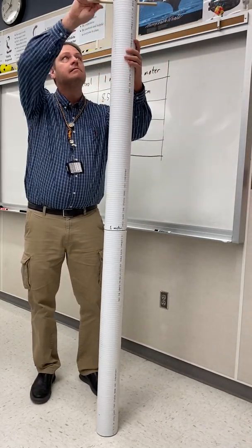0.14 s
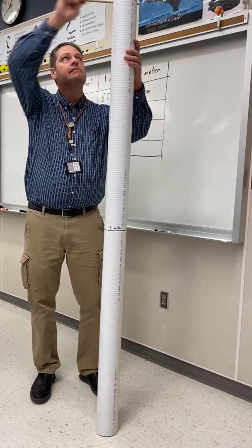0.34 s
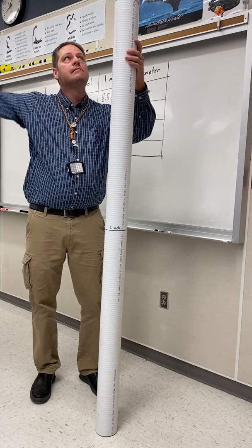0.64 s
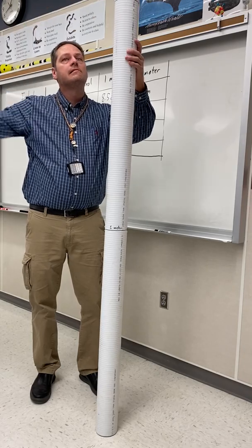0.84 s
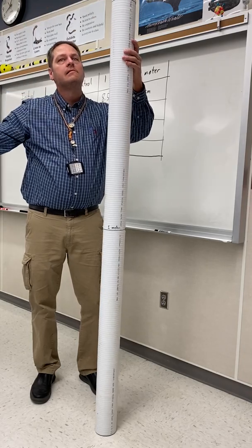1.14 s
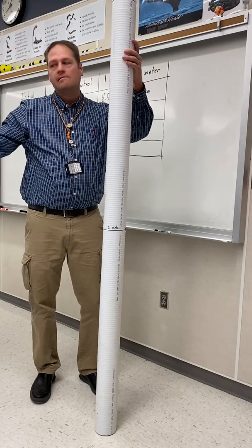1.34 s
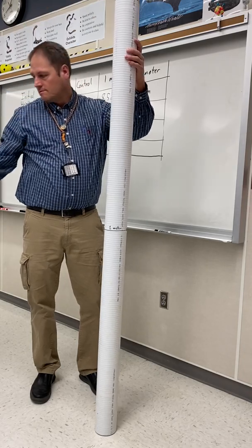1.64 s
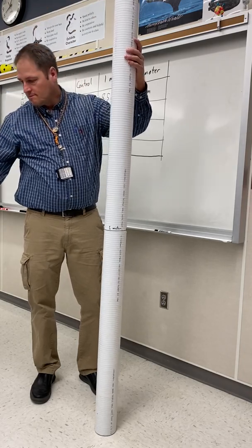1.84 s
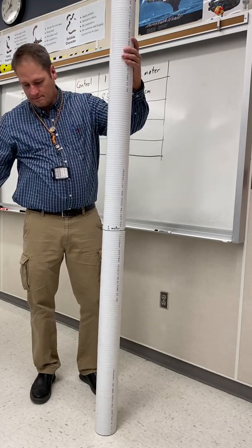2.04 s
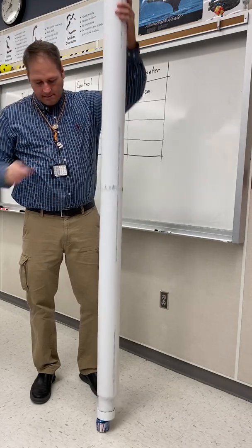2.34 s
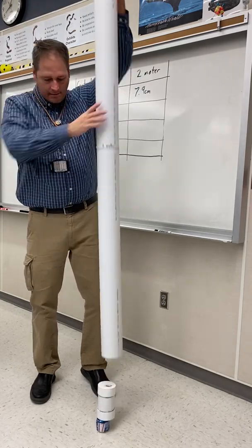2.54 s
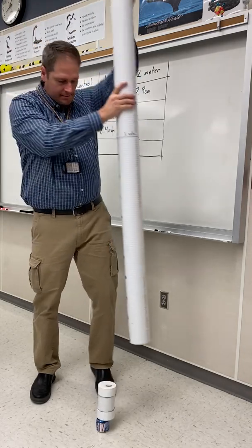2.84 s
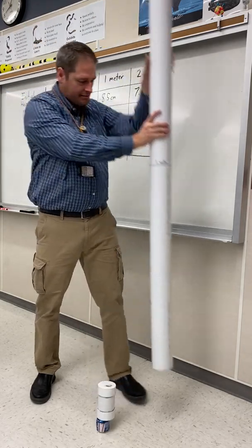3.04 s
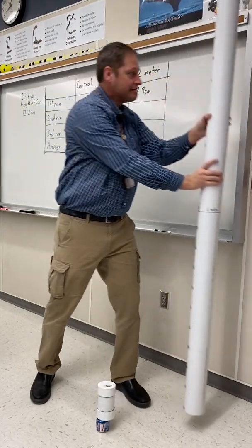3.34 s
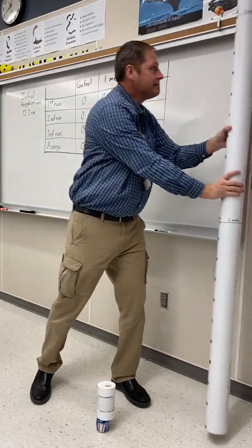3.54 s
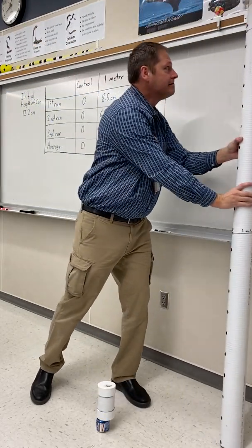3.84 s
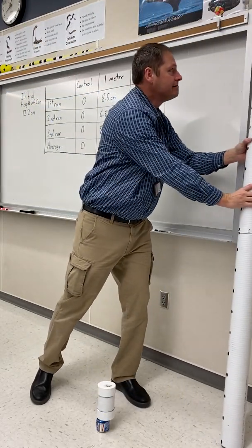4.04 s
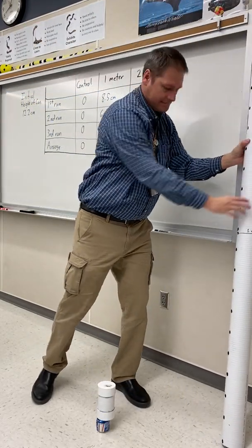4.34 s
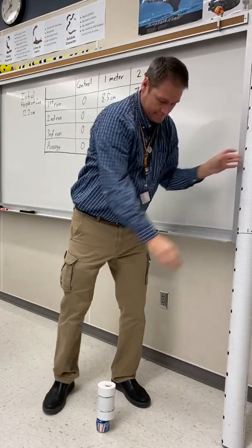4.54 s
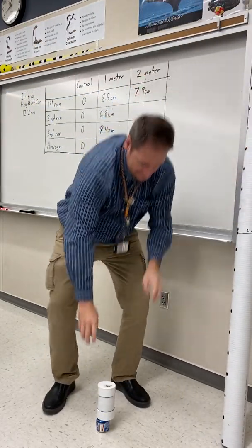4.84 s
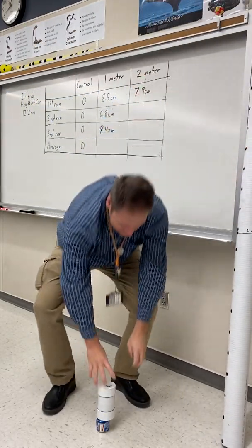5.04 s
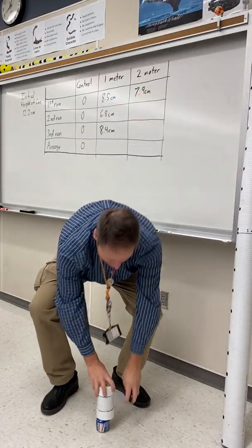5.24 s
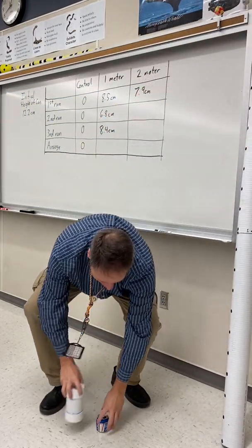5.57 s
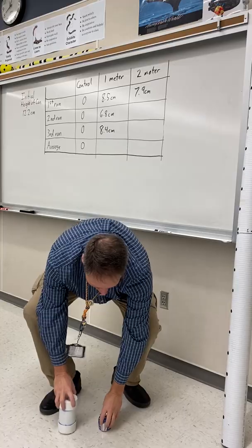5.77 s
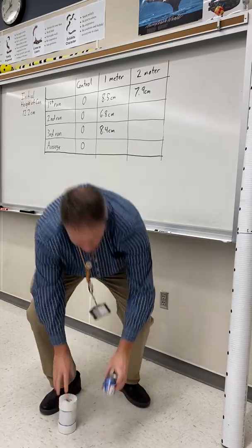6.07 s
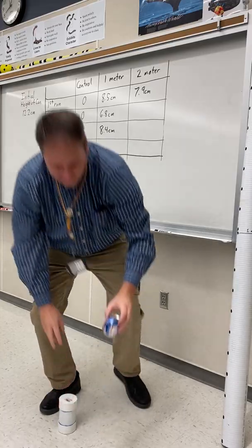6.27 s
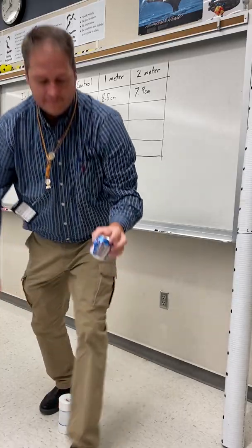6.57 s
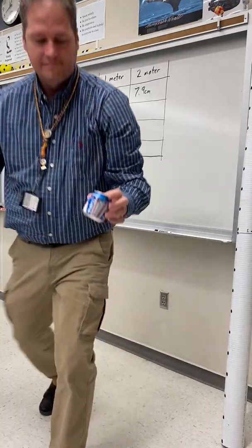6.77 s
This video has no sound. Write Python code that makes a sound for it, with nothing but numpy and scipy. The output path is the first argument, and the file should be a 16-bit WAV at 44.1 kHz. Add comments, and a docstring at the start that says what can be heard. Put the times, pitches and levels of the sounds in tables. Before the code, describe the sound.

In a slightly reverberant classroom with soft ventilation noise, a phone microphone picks up hollow rattling that builds inside a plastic tube until a falling weight crushes an aluminium can. A few quick pings follow from a dropped metal pin. The tube hums briefly as it is raised, then bumps against a wall. Faint cloth rustle, small clicks of the crushed can and one sharp clack on the floor come last.

```python
"""In a ventilated classroom a weight rattles down a tall plastic pipe, its impacts and friction exciting
the modes of wall and air column. At 1.1 s it slams onto a drink can, which buckles; at 1.9 s a metal pin
bounces and rings on the floor. The pipe is lifted off, humming, passed from hand to hand and leant on
the wall near 4 s. From 5.3 s can and weight are picked up, with clicks and a clack on the tiles.
All but the pipe's hum and the ventilation ring on in the room, heard through a phone's two close ports."""
import sys
import numpy as np
from scipy import signal
from scipy.fft import rfft, irfft, next_fast_len
from scipy.io import wavfile
from scipy.ndimage import map_coordinates

SR = 44100
rng = np.random.default_rng(int(sys.argv[2]) if len(sys.argv) > 2 else 0)


def to_wav(s):
    """Save 16-bit WAV."""
    ch = np.atleast_2d(s).T  # columns
    pcm = np.round(np.clip(ch, -1, 1) * 32767)  # PCM
    wavfile.write(sys.argv[1], SR, pcm.astype(np.int16))


N = 304731

# modes of pipe wall and air column: (frequency [Hz], bandwidth [Hz], gain [dB])
PIPE_MODES = [(282, 86, -14.5), (344.8, 65, 0), (460, 51, -4), (509, 40, -5), (602, 25, -0.5),
              (704, 59, -6), (876, 150, -9), (1037, 54, -6), (1176, 130, -12.5), (1550, 330, -17.5),
              (1940, 180, -20.5)]
# spectrum of a hard contact: (frequency [Hz], gain [dB])
TICK_SPECTRUM = [(300, -4.5), (900, -7.5), (2000, -7.5), (3500, -7.5), (5500, -13), (8000, -15),
                 (11000, -36.5)]
# top treble of skin friction and contact snaps: (frequency [Hz], gain [dB])
TREBLE_SPECTRUM = [(5000, -42), (8000, -4.5), (12000, 1.5), (15500, -1.5)]


def amp(db):
    """Amplitude ratio of a level in dB."""
    return 10 ** (np.asarray(db) / 20)


def unit(x):
    """Normalisation to rms 1."""
    return x / np.sqrt(np.mean(x ** 2) + 1e-20)


def along(points, hz):
    """Interpolation of (frequency [Hz], value) points on a log frequency axis."""
    f, v = np.transpose(points)
    return np.interp(np.log(hz + 1), np.log(f + 1), v)


def add(track, s, sound):
    """Superposition of a sound on a track at time s."""
    part = track[round(s * SR):][:len(sound)]
    part += sound[:len(part)]


def filtered(x, response):
    """Linear filtering: the spectrum of x times a complex frequency response."""
    m = next_fast_len(N + SR // 2)
    return irfft(rfft(x, m) * response(np.fft.rfftfreq(m, 1 / SR)), m)[..., :N]


def coloured(x, spectrum):
    """Zero-phase filtering by (frequency [Hz], gain [dB]) points."""
    return filtered(x, lambda hz: amp(along(spectrum, hz)))


def resonance(f, hz, width):
    """Response of a damped oscillator, gain 1 at its centre."""
    return 1j * f * width / (hz * hz - f * f + 1j * f * width)


def pipe(x, modes=PIPE_MODES):
    """Forced vibration: x drives pipe modes of alternating sign."""
    return filtered(x, lambda f: sum((-1) ** k * amp(db) * resonance(f, hz, width)
                                     for k, (hz, width, db) in enumerate(modes)))


def gritty(rate_hz, depth_db):
    """Amplitude modulation: noise whose level wanders at random."""
    knots = rng.standard_normal(int(N * rate_hz / SR) + 4)
    wander = map_coordinates(knots, [np.arange(N) * rate_hz / SR])
    return amp(depth_db * wander) * rng.standard_normal(N)


def stroke(peak, rise, fall, db):
    """Exponential envelope: up 30 dB in rise seconds to a peak, down 30 dB in fall seconds."""
    t = np.arange(N) / SR - peak
    return amp(db - 30 * np.maximum(-t / rise, t / fall))


def burst(db, t60, rise=0.00082):
    """Broadband transient: noise that swells and decays exponentially."""
    t = np.arange(SR // 4) / SR
    return amp(db - 60 * t / t60) * (1 - np.exp(-t / rise)) * rng.standard_normal(len(t))


def thump(db, hz, t60):
    """Impulse response of one damped mode."""
    t = np.arange(SR // 2) / SR
    return amp(db - 60 * t / t60) * np.sin(2 * np.pi * hz * t)


def ring(modes, db, drift, rise=0):
    """Free vibration of modes struck at random strengths; phases wander by drift radians a sample."""
    t = np.arange(SR // 3) / SR
    out = np.zeros(len(t))
    for hz, level, t60 in modes:
        envelope = amp(db + level + rng.normal(0, 1.5) - 60 * t / t60)
        out += envelope * np.sin(2 * np.pi * hz * t + drift * np.cumsum(rng.standard_normal(len(t))))
    return out * (1 - np.exp(-t / rise)) if rise else out


def ventilation():
    """Broadband flow noise, different at each port, with wavering narrow-band tones."""
    # rush of air: (frequency [Hz], spectral density [dB])
    rush_spectrum = [(20, 2.5), (40, 5.5), (80, 5.5), (160, -1), (330, 1.5), (600, -8), (1100, -11),
                     (2000, -16), (3500, -23), (5500, -31.5), (8000, -49.5), (11500, -54), (15500, -61.5)]
    # fan tones: (frequency [Hz], level [dB])
    fan_tones = [(160, -60.5), (350, -69), (600, -69), (1095, -76)]
    flow = np.array([gritty(7, depth_db=2), gritty(2, depth_db=-1)])
    tones = sum(amp(db) * unit(filtered(rng.standard_normal(N), lambda f: resonance(f, hz, width=20)))
                for hz, db in fan_tones)
    return amp(-54) * unit(coloured(flow, rush_spectrum)) + tones


def room(x):
    """Diffuse reverberation: each port has its own noise tail, each frequency its own decay rate."""
    # reverberation time: (frequency [Hz], t60 [s])
    decay_times = [(100, 1), (400, 0.54), (1500, 0.23), (5000, 0.31), (12000, 0.15)]
    hz, t, noise = signal.stft(rng.standard_normal((2, SR)), SR, nperseg=256)
    tail = signal.istft(noise * amp(-60 * t / along(decay_times, hz)[:, None]), SR, nperseg=256)[1]
    delayed = np.pad(x, (250, 0))
    return signal.fftconvolve(delayed[None], tail / np.linalg.norm(tail[0]), axes=1)[:, :N]


def rustle():
    """Friction noise: cloth hisses in the middle treble, dry skin on plastic at the top."""
    # hand strokes: (peak time [s], rise [s], fall [s], level [dB], top treble offset [dB])
    strokes = [(2.469, 0.007, 0.034, -44, -6.5), (2.679, 0.051, 0.14, -49.5, -12),
               (3.116, 0.75, 0.29, -51, -9.5), (3.93, .1, 0.096, -64, -22), (4.15, 0.03, 0.038, -55, -14.5),
               (4.36, 0.37, 0.2, -60, -11), (4.43, .05, 0.61, -64, -15.5), (4.95, 0.28, 2.5, -61.5, -13.5),
               (5.338, 0.48, 0.083, -72.5, -10.5), (5.73, 0.215, 0.17, -87, -8),
               (5.93, .05, 0.24, -66, -34), (6.04, 0.099, 0.088, -68.5, -10),
               (6.192, 0.0032, 0.025, -69, 7), (6.218, 0.34, 2.8, -70, -12.5),
               (6.72, 0.36, 0.81, -70.5, -20)]
    # rubbing cloth: (frequency [Hz], spectral density [dB])
    cloth_spectrum = [(300, -58), (1100, -10.5), (2000, -8), (3500, -3.5), (5500, -7), (8000, -11),
                      (10000, -21.5)]
    cloth = unit(coloured(gritty(80, depth_db=1), cloth_spectrum))
    skin = unit(coloured(gritty(93, depth_db=1.5), TREBLE_SPECTRUM))
    cloth_gain = sum(stroke(s, rise, fall, db + 1) for s, rise, fall, db, _ in strokes)
    skin_gain = sum(stroke(s, rise, fall, db + top_db + 10.5) for s, rise, fall, db, top_db in strokes)
    return cloth_gain * cloth + skin_gain * skin


def booms():
    """Structure-borne sound: blows excite the low modes of floor and wall."""
    # floor and wall modes: (frequency [Hz], t60 [s])
    wall_modes = [(75, 0.19), (135, 0.23), (265, 0.06)]
    # blows: (time [s], level [dB], step to each higher mode [dB])
    thuds = [(3.77, -44, 1), (3.793, -48.5, -14.5), (3.853, -40, 15), (3.89, -43, 8), (3.941, -41, 9.5),
             (4.144, -48.5, 14), (4.164, -38, -3), (4.19, -41, -1), (4.4, -44, 4), (4.566, -57.5, 20.5),
             (5.875, -43.5, 3), (5.908, -49, 2)]
    out = np.zeros(N)
    for s, db, step_db in thuds:
        for k, (hz, t60) in enumerate(wall_modes):
            # every blow lands elsewhere, so the modes shift a little
            add(out, s, thump(db + step_db * (k - 1), hz * rng.uniform(0.85, 1.14), t60))
    return out


def hums():
    """Driven resonance, then free decay: the hanging pipe's note builds until its dragging rim lets go."""
    # pipe notes: (time [s], level [dB], frequency [Hz], swell [s], t60 [s])
    notes = [(2.193, -37.5, 438.4, 0.02, 0.29), (2.433, -31, 358.5, .046, 0.64)]
    out, t = np.zeros(N), np.arange(SR // 2) / SR
    onset = np.clip(t / .004, 0, 1)
    for s, db, hz, swell, t60 in notes:
        shape = np.where(t < swell, .65 + .35 * t / swell, .4 * amp(-60 * (t - swell) / t60))
        add(out, s, amp(db) * onset * shape * np.sin(2 * np.pi * hz * t))
    return out


def set_down():
    """Hard impact: the weight clacks on the tiles, edge first, and its shell rings briefly."""
    # contacts: (time [s], level [dB])
    contacts = [(5.8739, -23.5), (5.8800, -36), (5.89, -33.5), (5.91, -52)]
    # clack on tile: (frequency [Hz], gain [dB])
    clack_spectrum = [(300, 1), (800, -10), (1700, -1), (3000, 4.5), (5000, -4), (8000, -4), (15500, -29.5)]
    # modes of the shell: (frequency [Hz], level [dB], t60 [s])
    shell_modes = [(370.3, 5.5, 0.065), (640, 8.5, .04), (1740, 3.5, 0.034), (3040, -6, 0.045),
                   (3400, -15, 0.048), (4990, -6.5, 0.03)]
    clacks, shell = np.zeros((2, N))
    for s, db in contacts:
        add(clacks, s, burst(db + 5, 0.0063, rise=0.00022) + burst(db - 4.5, 0.04, rise=0.00032))
        add(shell, s, ring(shell_modes, db - 21.5, drift=0.073))
    return coloured(clacks, clack_spectrum) + shell


def can_clicks():
    """Thin-shell vibration: the crushed can scrapes, clicks and rings."""
    # clicks of the wall: (time [s], level [dB], contact t60 [s])
    clicks = [(5.2679, -50.5, 0.07), (5.3276, -51, 0.13), (5.3456, -48, 0.046), (5.765, -41.5, 0.027),
              (5.776, -43, 0.032), (5.785, -36.5, 0.018), (5.794, -43, 0.024), (5.81, -53, 0.034),
              (6.723, -46.5, 0.047), (6.758, -51.5, 0.045)]
    # modes of the can: (frequency [Hz], level [dB], t60 [s])
    can_modes = [(2063, -6, 0.072), (3340, -19.5, 0.015), (4900, -4.5, 0.038), (5450, -3, 0.0405),
                 (6240, -4.5, .03)]
    ringing, cracks, snaps = np.zeros((3, N))
    for s, db, t60 in clicks:
        add(ringing, s, ring(can_modes, db - 5.5, drift=0.13, rise=0.0036))
        add(cracks, s, burst(db + 14, t60, rise=0.0041))
        add(snaps, s, burst(db - 11, 0.03, rise=.001))
    return ringing + coloured(cracks, TICK_SPECTRUM) + coloured(snaps, TREBLE_SPECTRUM)


def pin_drop():
    """Inelastic bouncing: each weaker landing rings the pin's modes, and a low thump follows."""
    # landings: (time [s], level [dB], spectral tilt [dB/octave])
    bounces = [(1.8962, -30, 0), (1.962, -36.5, 2), (2.024, -43, -2), (2.0734, -54, -1), (2.13, -59, -4)]
    # modes of the pin: (frequency [Hz], level [dB], t60 [s])
    pin_modes = [(2234, -11, .12), (2540, -3, 0.04), (3185, 1, .1), (3250, -5, 0.27), (3425, -6, .09),
                 (4850, -11, .15), (4965, 4, 0.06), (5024, -6, 0.22), (5421, -9, 0.08), (5916, -10, .08),
                 (7003, -2, 0.07), (9200, -8, .06), (9330, -9, .06), (9711, -17, .08), (11480, -19, .09),
                 (11690, -19, 0.09), (12900, -28, .05), (13880, -28, 0.07)]
    ringing, cracks, snaps = np.zeros((3, N))
    for s, db, tilt_db in bounces:
        modes = [(hz, level + tilt_db * np.log2(hz / 4000), t60) for hz, level, t60 in pin_modes]
        add(ringing, s, ring(modes, db, drift=.045, rise=.0015))
        add(snaps, s, burst(db - 14.5, .015, rise=0.00092))
        add(ringing, s + 0.0294, thump(db - 10.5, 175.6, 0.23))
        add(cracks, s, burst(db + 16, 0.037, rise=0.0022) + burst(db + 5.5, 0.25))
    return ringing + coloured(cracks, TICK_SPECTRUM) + coloured(snaps, TREBLE_SPECTRUM)


def rattles():
    """Air-column resonance gives each bump a hollow note; a catching edge chirps roughly."""
    # notes of the air column: (time [s], level [dB], frequency [Hz], t60 [s])
    notes = [(.451, -36.5, 356, .25), (0.463, -30, 324, .2), (.566, -42.5, 400, .1), (.607, -42.5, 357, .1),
             (.674, -38, 353.6, .4), (0.742, -33, 399, .08), (.764, -37, 345, .15), (.817, -34, 600, .15),
             (.818, -36, 346, .2), (0.867, -33.5, 408, 0.073), (0.877, -26.5, 397, .1),
             (.898, -22, 405, .1), (.916, -21, 435, .08), (0.926, -23, 411, .12), (.952, -25, 445, .1),
             (1.004, -27.5, 608, .1), (1.013, -23, 709, .06), (1.031, -28.5, 477, .08),
             (1.044, -17.5, 714, .06), (1.053, -20, 630, .05), (1.071, -21.5, 703, .08),
             (1.134, -18, 540, .1), (1.148, -27, 580, .1), (1.174, -25.5, 492, .2), (1.284, -33, 330, .2),
             (1.295, -35, 611, .2), (1.32, -30.5, 433.6, .2), (1.352, -31, 322.4, .2),
             (1.375, -35, 558, .25), (1.42, -36, 509.5, 0.34), (1.46, -38.5, 584.6, .3),
             (3.772, -42.5, 592, .15), (3.852, -27.5, 585, 0.067), (3.897, -37, 600, 0.079),
             (4.397, -38, 341.5, 0.22), (4.411, -47, 503, 0.099)]
    # chirps of the edge: (time [s], duration [s], level [dB], frequency [Hz])
    chirps = [(0.387, 0.027, -46, 900), (0.443, 0.016, -36, 1063), (.456, 0.032, -30.5, 844),
              (0.45, 0.044, -41, 2200), (.458, .03, -42, 3600), (0.61, 0.024, -42, 3454),
              (0.749, .03, -38, 1754), (0.812, 0.032, -39.5, 1000), (0.896, 0.022, -32, 1695),
              (0.979, 0.019, -31, 2185), (.98, .025, -35, 1404), (1.003, .03, -40, 3870),
              (1.012, 0.028, -34.5, 5000), (1.06, .04, -27, 1185), (1.064, 0.02, -34, 2300),
              (1.109, 0.0072, -20, 3100), (3.765, 0.0053, -38, 3600), (3.766, 0.041, -51, 1998),
              (3.854, 0.027, -46, 2765), (3.93, .015, -54, 2000), (4.125, 0.022, -49.5, 2279),
              (4.391, 0.05, -53, 2648), (4.393, 0.038, -48.5, 1996), (4.407, 0.022, -45, 1217),
              (5.334, 0.058, -53, 3340), (5.8, 0.045, -58, 2056), (5.863, 0.012, -49, 2966),
              (6.712, 0.011, -55.5, 5025)]
    out, t = np.zeros(N), np.arange(SR // 3) / SR
    for s, db, hz, t60 in notes:
        add(out, s, ring([(hz, 0, t60)], db, drift=0.027, rise=0.0019))
    for s, length, db, hz in chirps:
        arch = np.sin(np.pi * np.clip(t / length, 0, 1))
        add(out, s, ring([(hz, 0, .4)], db, drift=.1) * arch)
    return out


def falling(db, db_per_s):
    """Exponential gain during the free fall, as the weight speeds up and the air column shortens."""
    start_s, landing_s, attack_s = .866, 1.112, 0.014
    t = np.arange(N) / SR - start_s
    gate = np.clip(t / attack_s, 0, 1) * (t < landing_s - start_s)
    return amp(db + db_per_s * np.clip(t, 0, 1)) * gate


def slide():
    """Sliding friction drives the low and high modes of the pipe unevenly and hisses out of its ends."""
    # friction strokes, the weight on the wall until 1.5 s, then the pipe lifted off from 2.2 s: (peak time [s],
    # duration [s], scrape [dB], tone [dB], high over low modes [dB])
    rubs = [(0.357, 0.22, -46, -45.5, -8.5), (0.423, 0.29, -44.5, -55.5, 1), (0.453, 0.089, -40.5, -34, -1),
            (0.555, 0.068, -52, -55, -6.5), (0.632, 0.051, -51, -46.5, -8),
            (0.657, 0.048, -44.5, -42, -6.5), (0.702, 0.085, -62.5, -55.5, -9.5),
            (0.745, 0.068, -41.5, -37.5, -3), (0.811, 0.038, -44, -49.5, -2),
            (0.988, 0.028, -37.5, -50.5, -3), (1.02, 0.04, -31.5, -38, 9.5), (1.096, 0.077, -36, -43, 4.5),
            (1.119, 0.09, -41, -24, -1), (1.197, 0.2, -36.5, -41, 2.5), (1.282, 0.17, -37, -44.5, 9.5),
            (1.369, 0.14, -53.5, -37.5, -4.5), (1.462, 0.084, -75, -51.5, -0.5),
            (2.207, 0.27, -54.5, -48.5, -15), (2.288, 0.12, -62, -56.5, 8), (2.335, 0.14, -54.5, -48, -7),
            (2.427, 0.058, -48.5, -50, -17)]
    # friction hiss: (frequency [Hz], spectral density [dB])
    scrape_spectrum = [(500, -26.5), (1100, -2.5), (1500, -5), (2000, -9.5), (3500, -5), (5500, -17),
                       (8000, -23), (11500, -25), (15500, -26)]
    # resonances in the hiss: (frequency [Hz], bandwidth [Hz], gain [dB])
    scrape_modes = [(1790, 410, -1.5), (3514, 440, 3.5), (4940, 350, -5.5)]
    scrape_gain, low_gain, high_gain = falling(-35.5, 20), falling(-32, -38.5), falling(-35.5, 30)
    for s, length, scrape_db, tone_db, high_db in rubs:
        rise, scrape_fall, tone_fall = 0.36 * length, 0.95 * length, 1.19 * length
        scrape_gain += stroke(s, rise, scrape_fall, scrape_db)
        low_gain += stroke(s, rise, tone_fall, tone_db)
        high_gain += stroke(s, rise, tone_fall, tone_db + high_db)
    low = unit(pipe(gritty(45, depth_db=5), PIPE_MODES[:3]))
    high = unit(pipe(gritty(90, depth_db=5.5), PIPE_MODES[3:]))
    hiss = coloured(gritty(130, depth_db=3.5), scrape_spectrum)
    return low_gain * low + high_gain * high + scrape_gain * unit(hiss + pipe(hiss, scrape_modes))


def knocks():
    """Impact excitation: each contact ticks at the pitch of its spot, snaps and shakes the plastic."""
    # knocks of pipe and weight: (time [s], level [dB], body offset [dB], snap offset [dB], pitch [Hz])
    contacts = [(0.377, -40.5, -7, -19, 860), (0.4483, -31.5, -5.5, -11.5, 900),
                (0.4577, -38.5, -8, -10.5, 810), (0.555, -48, 6, -9.5, 990),
                (0.6087, -40.5, -0.5, -25.5, 2000), (0.6516, -39, -10, -16.5, 790),
                (0.6674, -37.5, -11, -17.5, 800), (0.738, -37.5, -2, -12.5, 1310), (0.758, -39, 5, 0, 1360),
                (0.8145, -35, 2.5, -11.5, 1006), (0.8741, -30.5, 5, -10, 810), (0.9024, -27, 1, -12, 815),
                (0.9287, -28.5, -7, -16.5, 724), (0.9557, -35.5, -2.5, -11, 1010),
                (0.9797, -23, -16, -4.5, 1260), (1.0122, -24, -11, -13, 1910),
                (1.0681, -25, -11, -13.5, 1110), (1.045, -23, -3, -13.5, 830),
                (1.2614, -30.5, 2.5, -16, 1672), (2.188, -46, -1.5, -24, 1283),
                (2.3353, -41, -3, -20.5, 1017), (2.4091, -36, -25, -8, 3200), (2.4664, -42, -2, 8.5, 1143),
                (3.7626, -36.5, 0.5, -8.5, 1195), (3.7658, -37.5, 0.5, -10, 1136),
                (3.8448, -35.5, 6, -7, 2220), (3.8526, -41, 11.5, -13.5, 1090),
                (3.8901, -51, 18, -14.5, 960), (3.941, -50.5, 0, -5, 870), (4.129, -44.5, 4, -11, 2280),
                (4.143, -39, -4.5, -9, 824), (4.39, -32, -11, 0, 2670), (4.3948, -28.5, -2.5, -6.5, 2696),
                (4.4118, -40, -6.5, -13, 1210), (4.5629, -47, -2, -23, 1516),
                (5.3235, -42, -2.5, -14, 1720), (6.2181, -53, 4.5, -5, 985)]
    rise_s = .0018
    ticks, snaps, shakes = np.zeros((3, N))
    for s, db, body_db, snap_db, spot_hz in contacts:
        add(ticks, s + rise_s, ring([(spot_hz, 0, .04)], db + 1, drift=0.11))
        add(ticks, s, burst(db + 8.5, 0.043, rise_s))
        add(snaps, s, burst(db + snap_db, 0.0096, 0.00055) + burst(db + snap_db + 2, 0.0044, 0.00036))
        add(shakes, s, burst(db + body_db + 22.5, 0.063, rise_s))
    return coloured(ticks, TICK_SPECTRUM) + coloured(snaps, TREBLE_SPECTRUM) + pipe(shakes)


def slam():
    """Buckling under impact: the can folds crease by crease as the floor is pushed and the pipe booms."""
    # the landing: (time [s], push [dB], pipe [dB], crush [dB])
    landing = [(1.1169, -5.5, -9, -9.5)]
    # noise of the collapse: (frequency [Hz], gain [dB])
    crush_spectrum = [(200, -12.5), (1000, -1), (2000, -1), (3500, -8), (5500, -4.5), (8000, -4),
                      (15500, -14)]
    # creases of the can wall: (time [s], level [dB])
    creases = [(1.1106, -24), (1.1181, -17), (1.1237, -26), (1.132, -27), (1.152, -28.5), (1.178, -31)]
    # modes of the folding can: (frequency [Hz], level [dB], t60 [s])
    fold_modes = [(813, -11, 0.11), (1048, -10, 0.14), (1217, -3, 0.068), (1730, -7, 0.14),
                  (1870, -2, 0.043), (2930, -6.5, 0.077), (3430, -9.5, .12), (4420, -12, .04),
                  (4810, -14.5, 0.1)]
    # noise of a crease: (frequency [Hz], gain [dB])
    crumple_spectrum = [(500, -13), (1500, 0.5), (3200, -3), (4500, -16.5), (12000, -28)]
    push, shake, crush, folds, crumple = np.zeros((5, N))
    for s, push_db, pipe_db, crush_db in landing:
        add(push, s + .003, thump(push_db - 1, 340, .035) + thump(push_db, 615, .06))
        add(push, s + 0.0027, thump(push_db - 16, 501, 0.34) + thump(push_db - 18.5, 76, 0.19))
        add(shake, s, burst(pipe_db + 10, 0.16, rise=0.0049))
        crack = burst(crush_db + 17, .007, rise=0.00058)
        add(crush, s + .0006, crack + burst(crush_db - 3, 0.16))
    for s, db in creases:
        add(folds, s, ring(fold_modes, db, drift=0.13))
        add(crumple, s, burst(db + 8, 0.02))
    return folds + push + pipe(shake) + coloured(crush, crush_spectrum) + coloured(crumple, crumple_spectrum)


def scene():
    """Superposition of direct sound, reverberation and ventilation at the two ports."""
    blow, rubbing, hits = slam(), slide() + rustle(), knocks()
    bumps, metal = booms() + rattles(), pin_drop() + can_clicks()
    sends_db = [(blow, -10), (rubbing, -7), (hits, -2), (bumps, -7), (metal, -1.5)]
    reverberation = sum(amp(db) * room(source) for source, db in sends_db)
    clack = set_down()
    reverberation += amp(-5.5) * room(clack)
    direct = blow + amp(-4) * rubbing + hits + bumps + metal + clack + hums()
    return direct + reverberation + ventilation()


def record(dry):
    """Coherence of close ports: they share bass and top treble; deep bass rolls off, peaks saturate."""
    # gain of the ports' difference over their sum: (frequency [Hz], gain [dB])
    apart = [(60, -28.5), (250, -19.5), (600, -4.5), (1200, -5), (2000, -10), (3500, -3.5), (5500, -16),
             (8000, -32), (11000, -12.5), (14000, -26)]
    # left port over right: (frequency [Hz], gain [dB])
    balance = [(60, -0.5), (400, -1.5), (1000, -0.85), (2000, -0.6), (5000, -1), (9000, 0.9)]
    # lead of the left port: (frequency [Hz], phase [rad])
    lead = [(0, 0), (2000, 0), (3000, 1.1), (5500, .8), (6800, 2.8), (8100, 3.5), (9600, 5.9), (11300, 6.8),
            (13000, 9.1), (14300, 9.7), (16000, 12.2)]
    bass_hz, top_hz, ceiling = 32, 15800, .92
    common = filtered(dry[0] + dry[1], lambda hz: .5 / np.hypot(1, amp(along(apart, hz))))
    own = filtered(dry[0] - dry[1], lambda hz: 1 / np.hypot(1, amp(-along(apart, hz))))
    side = np.array([[.5], [-.5]])
    tilt = lambda hz: amp(side * along(balance, hz))
    phase = lambda hz: np.exp(1j * side * np.interp(hz, *np.transpose(lead)))
    bass_cut = lambda hz: (1j * hz / (bass_hz + 1j * hz)) ** 2
    ports = filtered(np.array([common + own, common - own]), lambda hz: tilt(hz) * phase(hz) * bass_cut(hz))
    rounded = ports / (1 + np.abs(ports / ceiling) ** 4) ** (1 / 4)
    return filtered(rounded, lambda hz: hz < top_hz)


dry = scene()
out = record(dry)
to_wav(out)
```